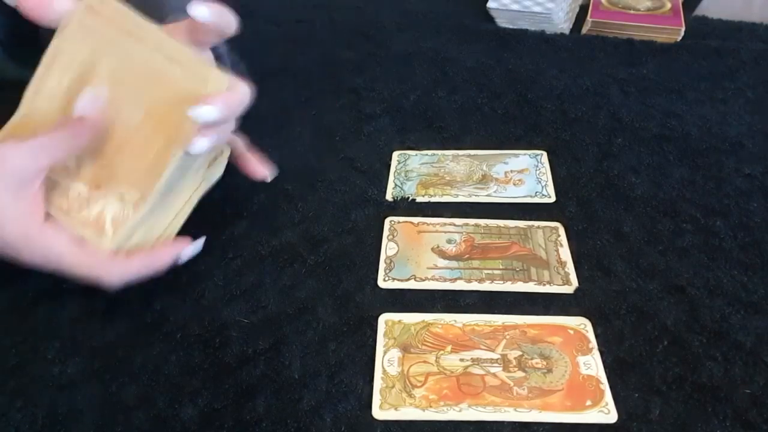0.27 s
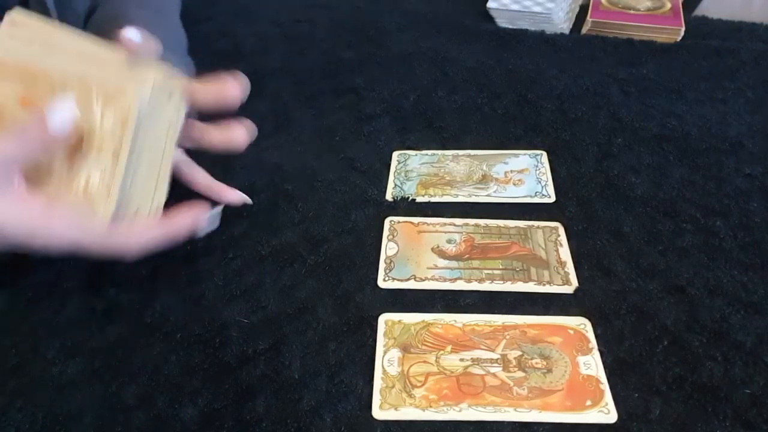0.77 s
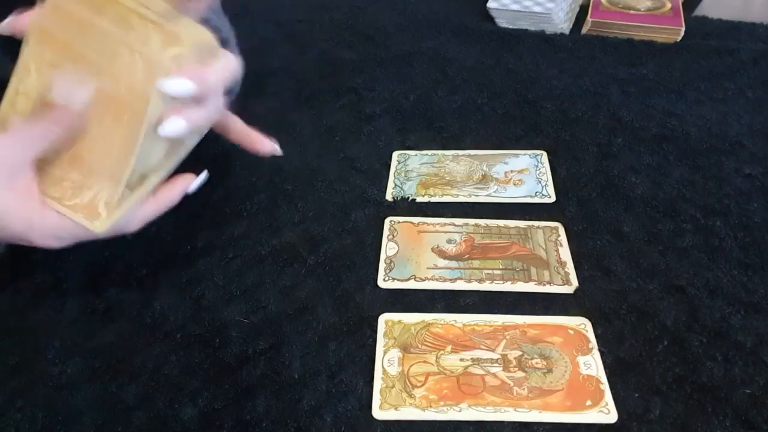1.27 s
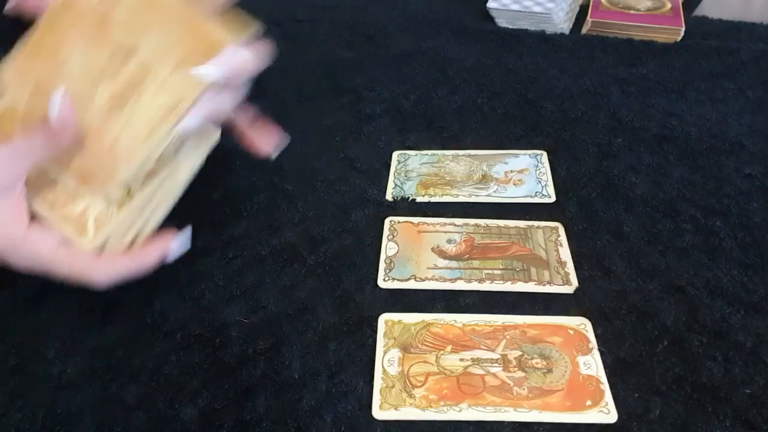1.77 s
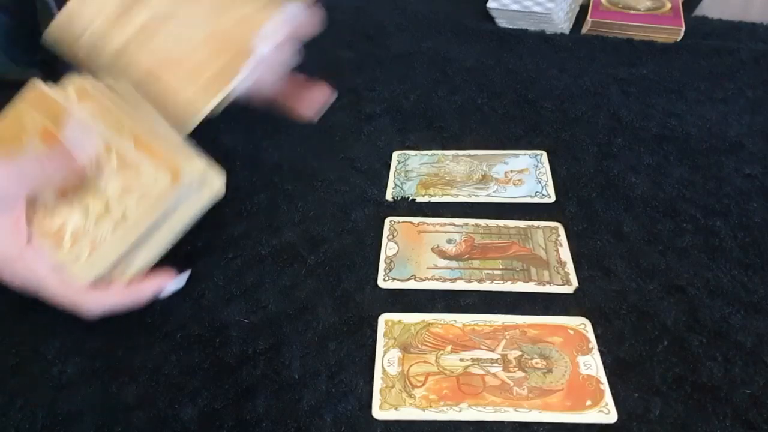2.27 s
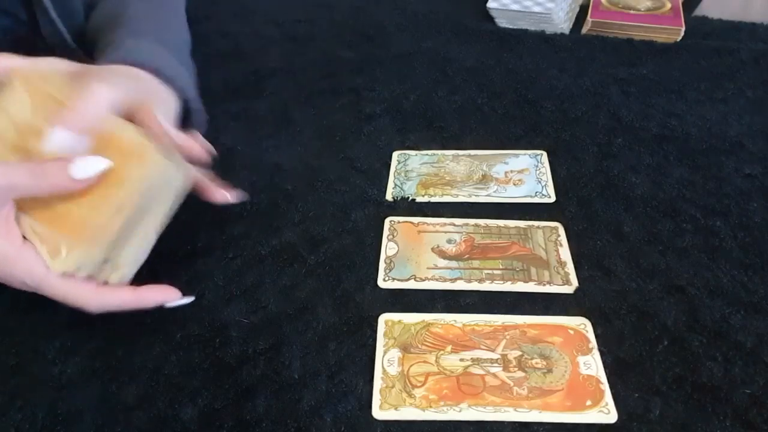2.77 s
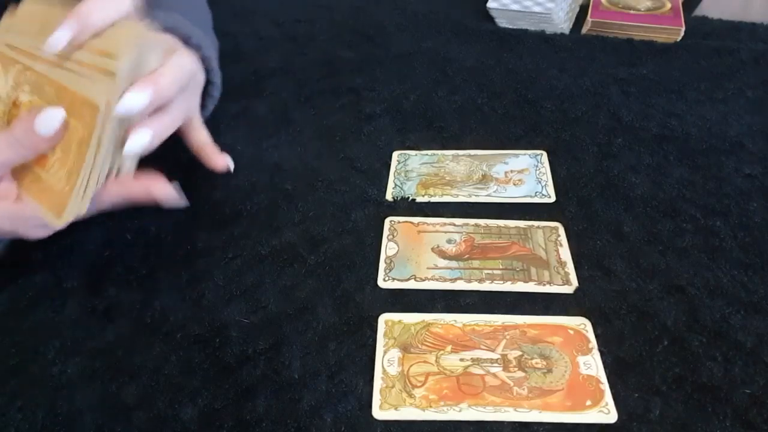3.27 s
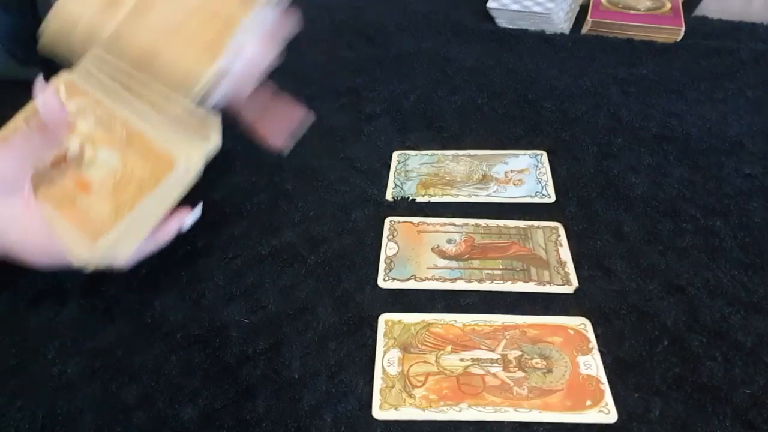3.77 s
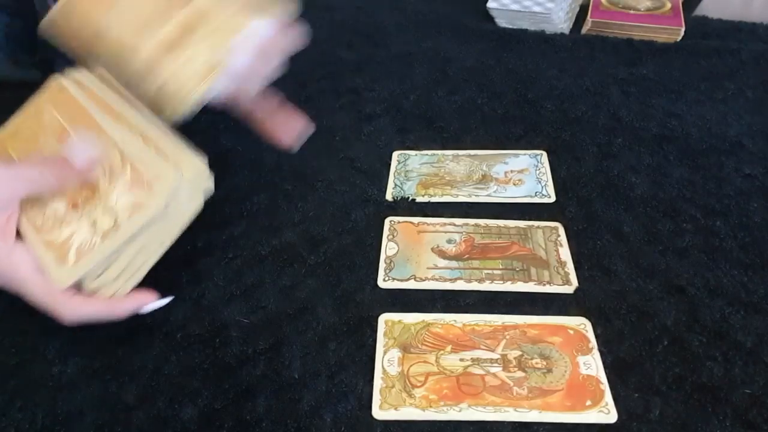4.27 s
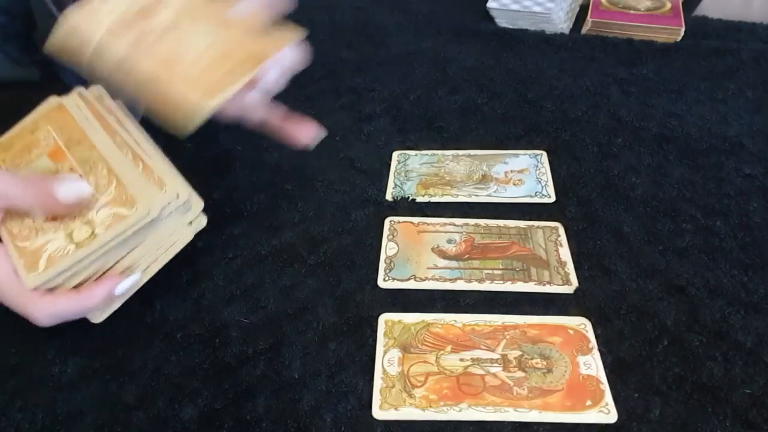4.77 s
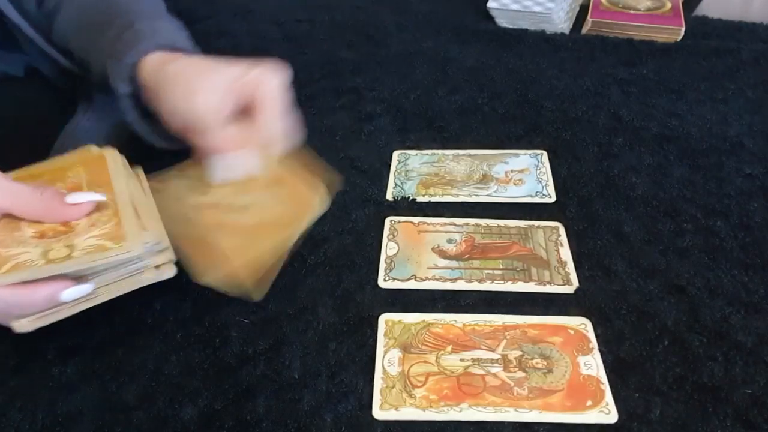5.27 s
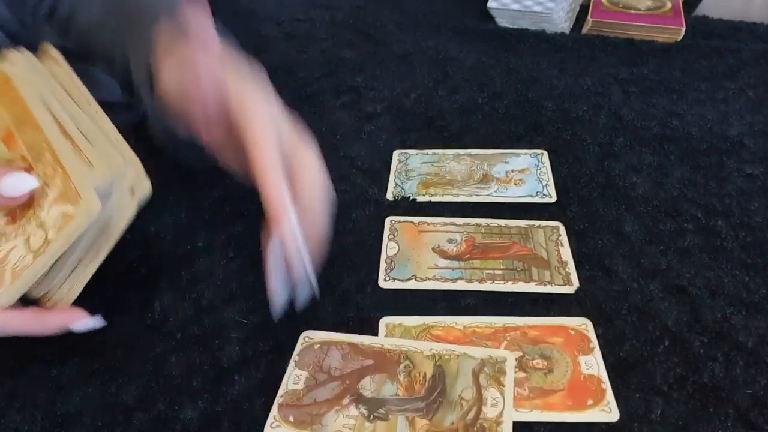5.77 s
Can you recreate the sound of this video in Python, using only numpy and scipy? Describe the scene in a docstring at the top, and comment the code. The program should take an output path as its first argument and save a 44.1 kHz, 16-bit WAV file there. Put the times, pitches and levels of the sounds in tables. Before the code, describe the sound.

Large cards shuffled overhand close by, packets swishing and slapping in soft quick strokes, then one card snapped off sharply, over a faint low hum.

```python
"""A deck of large cards is shuffled overhand, mostly just left of a two-port microphone; late on one card is flicked
onto a cloth. Slaps and ticks are short rings with edge cracks, thumps and rattles; sliding packets are grainy noise
in a hiss band and a scrape band. A hard surface two metres off echoes the cards as a dense room tail sets in.
A low hum, rumble, a faint hush and three far footfalls lie underneath."""
import sys
import numpy as np
from scipy import signal
from scipy.fft import rfft, irfft, next_fast_len
from scipy.io import wavfile
from scipy.ndimage import uniform_filter1d, map_coordinates

SR = 44100
rng = np.random.default_rng(int(sys.argv[2]) if len(sys.argv) > 2 else 0)


def log_audio(samples):
    """Write samples as a 16-bit WAV file to the path given in sys.argv[1]."""
    # one column per channel
    frames = np.atleast_2d(samples).T
    # limit to full scale, then quantise
    limited = np.clip(frames, -1, 1)
    pcm = np.round(limited * 32767).astype(np.int16)
    wavfile.write(sys.argv[1], SR, pcm)


N = 264952

# Clearest slaps and ticks of edges and packets. Each row: start in seconds, blow gain in dB, ring in Hz,
# edge crack in dB re the ring, packet thump gain in dB re the ring.
TAP_ROWS = [(0.1005, -29, 1340, -8, -1.5), (0.1041, -37, 149, -30, -18), (0.2637, -27.5, 1770, -22, -11),
            (0.3257, -32.5, 2870, -1, -8), (0.3396, -40.5, 730, -2, 7), (0.502, -37.5, 1760, -24, -17),
            (0.5318, -31.5, 1820, -36, -6), (0.553, -40, 2880, -4, -42), (0.9251, -56.5, 1440, 4, 4.5),
            (0.9409, -62, 4820, 11, -32), (1.0521, -39, 1450, -9, -32), (1.0626, -21, 2320, -1, -9),
            (1.19, -41.5, 3900, -16, -28), (1.244, -36, 1670, -11, 0), (1.265, -31.5, 1290, -2.5, -7),
            (1.306, -39, 2290, -5, -30), (1.3373, -24.5, 5240, 11, -2), (1.346, -15.5, 5200, -33, -24),
            (1.351, -41, 3590, 14, 8.5), (1.5155, -36, 3820, -10, -12), (1.5205, -12.5, 1530, -25, -25),
            (1.6051, -33.5, 3350, 6, 0.5), (1.612, -37.5, 160, -30, -22), (1.6363, -44.5, 695, -11, 3),
            (1.7646, -9.5, 1950, -31, -20.5), (1.8452, -20.5, 4320, -6.5, -18),
            (1.8491, -22.5, 2670, -23, -6.5), (2.05, -37.5, 1800, -19, -3), (2.0878, -33, 3120, 3, -10),
            (2.1227, -26, 830, -3, -18), (2.1384, -22.5, 2870, -22, -11), (2.3183, -39, 1620, -26, -11),
            (2.3441, -33.5, 1710, -7, -5), (2.4057, -28, 900, -14, -44), (2.4301, -28, 1510, -7.5, -33),
            (2.4337, -28.5, 2350, -33, -5), (2.5544, -43, 1840, -12, -2), (2.5889, -25.5, 2890, -12, -17.5),
            (2.9924, -54, 4500, 5, -21.5), (3.2053, -55.5, 3850, 6.5, -15.5), (3.352, -36, 2040, -8, -9),
            (3.3641, -21.5, 1300, -4.5, -3), (3.3859, -40, 1030, 1, -6), (3.5272, -26.5, 1710, -35, -2),
            (3.534, -32, 2240, -30, -6), (3.5533, -27, 3170, -15, -8), (3.5612, -24.5, 1440, 1.5, -10),
            (3.5652, -28, 1470, -12, 4), (3.5919, -17.5, 1570, -15, -42), (3.5975, -16, 2900, -43, -39),
            (3.6039, -26.5, 1550, -32, 2.5), (3.7879, -27.5, 1740, -36, -4.5),
            (3.7954, -30.5, 1420, -35, -11), (3.8144, -32, 1390, -36, -3), (3.8763, -29.5, 2910, -14, -24),
            (3.8854, -26.5, 2970, -11, -5), (3.892, -29.5, 675, -22, -6), (4.0414, -39, 1390, -27, 2),
            (4.0505, -6.5, 1760, -40, -19.5), (4.0974, -21, 1680, -8.5, -8), (4.1341, -23, 3180, -30, -8),
            (4.3085, -38.5, 2420, -16, -2), (4.3369, -32.5, 1660, -13, -8.5), (4.41, -33, 1265, -4, -1),
            (4.551, -29, 1670, -34, -4), (4.5552, -29, 3278, -36, -13), (4.6206, -38, 1490, -19, 1),
            (4.6565, -25.5, 1520, -15, -3), (4.811, -33.5, 2080, -26, -5.5),
            (4.8489, -31.5, 2740, -11, -33), (4.9744, -52.5, 4580, 6, -35.5), (5.0333, -46, 5070, -3, -26),
            (5.058, -55, 2500, -9, -13.5), (5.239, -10.5, 1620, -33.5, -15.5), (5.2428, -8, 3360, -36, -9),
            (5.2463, -16.5, 700, -32.5, -2.5), (5.2556, -6, 2920, -7, -23),
            (5.2582, -17.5, 820, -30, -25.5), (5.2626, -10, 2800, -19.5, -28),
            (5.3052, -16.5, 2200, -11, -7.5), (5.3474, -25, 3020, -25, -12), (5.417, -39, 3510, -8, -33),
            (5.4925, -24, 2520, -13, -6), (5.5791, -20, 3380, -37, -31), (5.587, -22, 4390, -26, -24),
            (5.5901, -21.5, 3700, -24, -11), (5.6588, -33.5, 3230, -21, -12.5),
            (5.9044, -40, 4140, -12.5, -32)]
# Thump modes of a packet. Each row: frequency in Hz, gain in dB.
PACKET_MODES = [(210, -15), (430, -9.5), (690, -2.5)]


def taps():
    """Trapped air rings for a cycle or two, the long edge cracks, the packet thumps and rattles on."""
    blow_samples = 1024
    out = np.zeros((2, N + blow_samples))
    t = np.arange(blow_samples) / SR
    rows = [*TAP_ROWS, *ticks()]
    chance = rng.standard_normal((len(rows), 4, blow_samples))
    crack_band = signal.butter(2, [2800, 11500], "bandpass", fs=SR, output="sos")
    thump = sum(undb(db) * ring(t, hz, cycles=0.68) for hz, db in PACKET_MODES)
    for (start_s, gain_db, hz, crack_db, thump_db), noise in zip(rows, chance):
        # an edge is long, so each port hears its own crack and rattle
        crack = signal.sosfilt(crack_band, noise[:2] * t * np.exp(-t / 0.00022))
        crack = crack / np.max(np.abs(crack))
        rattle_band = signal.butter(3, [hz / 2, hz * 2], "bandpass", fs=SR, output="sos")
        rattle = level(signal.sosfilt(rattle_band, noise[2:]), -12) * np.exp(-t / 0.0017)
        body = ring(t, hz, cycles=0.74) + undb(thump_db) * thump
        blow = ports(body, start_s, stray=0.2 * noise[0, 0])
        blow = blow + undb(crack_db) * crack + rattle
        first = int(start_s * SR)
        out[:, first:first + blow_samples] += undb(gain_db) * blow
    return out[:, :N]


# Level above the stroke's hiss, uniform scatter, ring range, crack and thump of small chance ticks.
TICK_DB, TICK_SCATTER_DB, TICK_HZ = 5, 8, (1450, 4330)
TICK_CRACK_DB, TICK_THUMP_DB = -1, -13.5


def ticks(count=7):
    """Small chance ticks scattered through every stroke, as rows like those of TAP_ROWS."""
    rows = []
    draws = rng.random((len(STROKE_ROWS), count, 3))
    for (touch_s, stop_s, touch_db, stop_db, *_), draw in zip(STROKE_ROWS, draws):
        for at, size, pitch in draw:
            hiss_db = touch_db + at * (stop_db - touch_db)
            db = hiss_db + TICK_DB + TICK_SCATTER_DB * (2 * size - 1)
            hz = TICK_HZ[0] * (TICK_HZ[1] / TICK_HZ[0]) ** pitch
            start_s = min(touch_s + at * (stop_s - touch_s), N / SR)
            rows.append((start_s, db, hz, TICK_CRACK_DB, TICK_THUMP_DB))
    return rows


# Spectrum of the sliding hiss. Each row: frequency in Hz, relative density in dB per Hz.
HISS_SPECTRUM = [(1500, -25.5), (2500, 1.5), (3800, 5.5), (6500, -0.5), (9500, -8.5), (13000, -11),
                 (16000, -7)]
# Spectrum of the scrape. Each row: frequency in Hz, relative density in dB per Hz.
SCRAPE_SPECTRUM = [(150, 15.5), (300, 8.5), (700, 3), (1700, 7), (2500, 1), (4000, -39)]


def slide():
    """Stick-slip grains along the coated faces: bright fluttering hiss, crackly scrape and the drawn card."""
    hiss_db, scrape_db = rubbing()
    grip_db = 3 * walk(200)
    grains = rng.standard_normal((4, N)) * undb(rng.exponential(size=(4, N)) + grip_db)
    hiss = 0
    for hz in 2500 * 2 ** np.arange(0, 3, 0.5):
        band = [(hz / 1.7, -30), (hz / 1.2, 0), (hz * 1.2, 0), (hz * 1.7, -30)]
        # each band wavers by itself, so the colour flutters
        hiss = hiss + colour(grains[:3], band) * undb(2.5 * walk(25))
    hiss = level(colour(hiss, HISS_SPECTRUM), -3) * undb(hiss_db)
    # single card edges catch now and then
    catches = undb(3.2 * rng.exponential(size=N))
    scrape = level(colour(grains[3] * catches, SCRAPE_SPECTRUM), 0) * undb(scrape_db)
    # the faces are wide, so half of the hiss differs between the ports
    return ports(scrape + drawn_card(grains[3]) + hiss[0], np.arange(N) / SR) + hiss[1:]


# Packets sliding in. Each row: touch in seconds, stop in seconds, hiss gain at touch in dB, hiss gain at stop in dB,
# scrape gain at touch in dB, scrape gain at stop in dB.
STROKE_ROWS = [(0.0, 0.089, -65, -56, -56.5, -56), (0.256, 0.302, -58, -52.5, -80, -58),
               (0.504, 0.536, -61, -53, -58, -52), (0.642, 0.766, -75.5, -57.5, -72, -67),
               (0.94, 1.102, -73, -60, -93, -58), (1.24, 1.347, -61, -44.5, -51, -69),
               (1.509, 1.62, -51.5, -49.5, -45.5, -47), (1.77, 1.871, -49.5, -59, -39.5, -63),
               (2.054, 2.153, -54.5, -60, -52.5, -62), (2.314, 2.409, -53, -60, -51.5, -58),
               (2.558, 2.593, -60.5, -48, -71, -50), (2.702, 2.737, -72, -54.5, -90, -66),
               (2.835, 2.877, -72, -55.5, -90, -58.5), (2.928, 2.989, -75, -64.5, -74, -88.5),
               (3.213, 3.335, -66, -59, -81.5, -81), (3.524, 3.61, -62, -51.5, -51.5, -47.5),
               (3.792, 3.863, -57.5, -49, -44.5, -56), (4.046, 4.118, -52, -48, -47, -42),
               (4.304, 4.355, -63, -54, -56, -55.5), (4.558, 4.662, -51, -58, -46, -64),
               (4.813, 4.831, -59, -51, -55, -51), (4.961, 5.15, -76.5, -65.5, -85.5, -75),
               (5.17, 5.222, -61, -46.5, -73.5, -60), (5.231, 5.302, -63, -44.5, -52, -47),
               (5.495, 5.56, -60.5, -62, -47.5, -61), (5.58, 5.655, -61, -63, -64, -53),
               (5.908, 6.006, -60, -56.5, -68, -71.5)]
# Packets jamming home with a short rush. Each row: time in seconds, hiss gain in dB, scrape gain in dB.
JAM_ROWS = [(0.335, -50.5, -42.5), (1.06, -53, -54.5), (1.269, -50.5, -48.5), (1.346, -44.5, -34.5),
            (1.849, -47, -42), (2.125, -40, -39.5), (2.397, -48, -46.5), (3.359, -45.5, -47.5),
            (3.567, -42.5, -38), (3.598, -40.5, -33), (3.888, -48.5, -43.5), (4.652, -47.5, -43),
            (5.246, -48, -34), (5.26, -61.5, -33), (5.588, -55, -41.5)]
TOUCH_DB_S, HISS_FADE_DB_S, SCRAPE_FADE_DB_S = 2001, 246, 225  # slopes before touch, after stop
JAM_RISE_DB_S, JAM_FALL_DB_S = 598, 604


def rubbing():
    """Hiss and scrape gains in dB: the loudest stroke or jam at each moment."""
    now_s = np.arange(N) / SR
    gains_db = []
    for k, fade_db_s in enumerate((HISS_FADE_DB_S, SCRAPE_FADE_DB_S)):
        strokes = [ramp(now_s, r[0], r[1], r[2 + 2 * k], r[3 + 2 * k], TOUCH_DB_S, fade_db_s)
                   for r in STROKE_ROWS]
        jams = [ramp(now_s, r[0], r[0], r[1 + k], r[1 + k], JAM_RISE_DB_S, JAM_FALL_DB_S)
                for r in JAM_ROWS]
        gains_db.append(np.max(strokes + jams, axis=0))
    return gains_db


DRAW_S, SURGE_S, LET_GO_S = 5.1, 5.19, 5.235
DRAW_HZ, DRAW_DB, LET_GO_DB = 3500, -59, -39.5


def drawn_card(grains):
    """One card dragged off the top rasps in a narrow band that surges before it lets go."""
    now_s = np.arange(N) / SR
    rasp = level(colour(grains, [(DRAW_HZ / 1.5, -25), (DRAW_HZ, 0), (DRAW_HZ * 1.4, -25)]), 0)
    drag_db = ramp(now_s, DRAW_S, SURGE_S, DRAW_DB, DRAW_DB, TOUCH_DB_S, TOUCH_DB_S)
    surge_db = ramp(now_s, SURGE_S, LET_GO_S, DRAW_DB, LET_GO_DB, TOUCH_DB_S, TOUCH_DB_S)
    return rasp * undb(np.maximum(drag_db, surge_db))


# Where the cards are. Each row: time in seconds, left minus right in dB, lead of the left port in seconds.
PLACE_ROWS = [(5.35, 3, 1.1e-4), (5.5, -2, -7e-5), (5.75, -2, -7e-5), (5.9, 4, 1.1e-4)]


def ports(x, now_s, stray=0):
    """A near sound reaches one port louder and earlier; stray scales both offsets by 1 + stray."""
    at_s, pan_db, lead_s = np.transpose(PLACE_ROWS)
    pan_db = np.interp(now_s, at_s, pan_db) * (1 + stray)
    lead_samples = np.interp(now_s, at_s, lead_s * SR) * (1 + stray)
    index = np.arange(len(x))
    return np.array([undb(side * pan_db) * map_coordinates(x, [index + side * lead_samples], order=3)
                     for side in (0.5, -0.5)])


# Bands of the room tail. Each row: centre in Hz, t60 in seconds, band gain in dB.
ROOM_BANDS = [(208, 0.35, -46.5), (505, 0.47, -45.5), (1280, 0.53, -48), (2260, 0.48, -53),
              (3700, 0.44, -47), (8900, 0.29, -46.5)]
ECHO_S, ECHO_DB, TAIL_RISE_S = 0.0133, -17, 0.0039


def room(cards):
    """One clear echo with a dense tail swelling behind it; mids last longest, the ports share the tail's bass."""
    t = np.arange(int(0.6 * SR)) / SR
    tail = np.zeros((2, len(t)))
    for hz, t60_s, db in ROOM_BANDS:
        band = [(hz / 3, -30), (hz / 1.65, 0), (hz * 1.41, 0), (hz * 3, -30)]
        mid, side = colour(rng.standard_normal((2, len(t))), band)
        side = side * min(hz / 1500, 1)
        tail += undb(db - 60 * t / t60_s) * [mid + side, mid - side]
    tail *= np.clip((t - ECHO_S) / TAIL_RISE_S, 0, 1)
    first = int(ECHO_S * SR)
    tail[:, first:first + 3] += undb(ECHO_DB) * np.array([0.25, 0.5, 0.25])  # slightly dull echo
    return signal.fftconvolve(cards[:1], tail, axes=1)[:, :N]  # the left port feeds both


# Far footfalls. Each row: start in seconds, gain in dB, floor mode in Hz, t60 in seconds.
STEP_ROWS = [(0.689, -38, 63.8, 0.95), (1.659, -32.5, 60, 0.28), (2.639, -35.5, 60.8, 0.37)]


def steps():
    """Far footfalls set the floor swinging, one decaying low mode each."""
    out, t = np.zeros(N + SR), np.arange(SR) / SR
    for start_s, db, hz, t60_s in STEP_ROWS:
        first = int(start_s * SR)
        out[first:first + SR] += undb(db) * ring(t, hz, cycles=t60_s * hz / np.log(1000))
    return out[:N]


# Low resonances. Each row: centre in Hz, width in Hz, gain in dB.
HUM_MODES = [(42.85, 0.78, -62), (75.7, 1.63, -53), (113.4, 3.3, -64.5)]


def hum():
    """Rumble held in narrow low resonances, so it wavers like a hum."""
    out = 0
    for hz, width_hz, db in HUM_MODES:
        b, a = signal.iirpeak(hz, hz / width_hz, SR)
        out = out + level(signal.lfilter(b, a, rng.standard_normal(N)), db)
    return out


# Spectrum of the rumble. Each row: frequency in Hz, relative density in dB per Hz.
RUMBLE_SPECTRUM = [(20, -6), (50, -22.5), (65, 3.5), (130, -11), (185, -17.5), (300, -21), (450, -47),
                   (800, -57.5)]
# Spectrum of the hush. Each row: frequency in Hz, relative density in dB per Hz.
HUSH_SPECTRUM = [(300, -31), (500, -4), (3600, -18), (8100, -28), (16000, -40)]
RUMBLE_DB, HUSH_DB = -54, -81


def air():
    """Steady room noise: a rumble mostly alike at both ports in the bass and a faint hush unrelated between them."""
    mid, side = colour(rng.standard_normal((2, N)), RUMBLE_SPECTRUM)
    side = colour(side, [(60, -16.0), (800, 0.5)])
    rumble = level(np.array([mid + side, mid - side]), RUMBLE_DB)
    hush = level(colour(rng.standard_normal((2, N)), HUSH_SPECTRUM), HUSH_DB)
    return rumble + hush


def undb(db):
    """Amplitude gain of a level in dB."""
    return 10 ** (np.asarray(db, float) / 20)


def level(x, db):
    """Scale to an rms level in dB."""
    return x * undb(db) / np.sqrt(np.mean(x ** 2))


def colour(x, points):
    """Shape the spectrum by (Hz, dB) points, joined along log frequency."""
    n = next_fast_len(x.shape[-1])
    hz = np.maximum(np.arange(n // 2 + 1) * SR / n, 1)
    at_hz, db = np.transpose(points)
    gain = undb(np.interp(np.log(hz), np.log(at_hz), db))
    return irfft(rfft(x, n) * gain, n)[..., :x.shape[-1]]


def walk(rate_hz):
    """Random levels drawn rate_hz times a second and slewed between; spread near 1."""
    k = int(SR / rate_hz)
    held = np.repeat(rng.standard_normal(N // k + 1), k)
    return uniform_filter1d(held, k)[:N]


def ring(t, hz, cycles):
    """A mode that swells within half a cycle and decays by 1/e per `cycles` periods; peak 1."""
    swell = 1 - np.exp(-(3 * hz * t) ** 2)
    y = np.sin(2 * np.pi * hz * t) * swell * np.exp(-hz * t / cycles)
    return y / np.max(np.abs(y))


def ramp(now_s, start_s, stop_s, start_db, stop_db, rise_db_s, fall_db_s):
    """Level in dB: 60 dB rise to start, straight line to stop, 60 dB fall after."""
    at_s = [start_s - 60 / rise_db_s, start_s, stop_s, stop_s + 60 / fall_db_s]
    return np.interp(now_s, at_s, [start_db - 60, start_db, stop_db, stop_db - 60])


def scene():
    """Cards, their echoes and the low background; hum and footfalls are a little louder on the left."""
    cards = taps() + slide()
    low = (hum() + steps()) * undb([[0.6], [-0.6]])
    return cards + room(cards) + air() + low


TOP_HZ = 15900


def record(dry):
    """The recorder cuts the top with a steep low-pass."""
    return signal.sosfilt(signal.ellip(10, 0.2, 70, TOP_HZ, fs=SR, output="sos"), dry)


dry = scene()
out = record(dry)
log_audio(out)
```